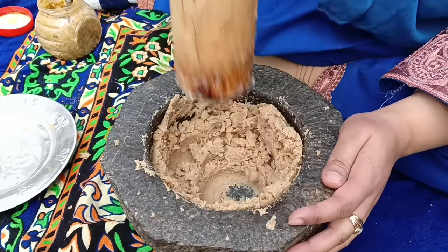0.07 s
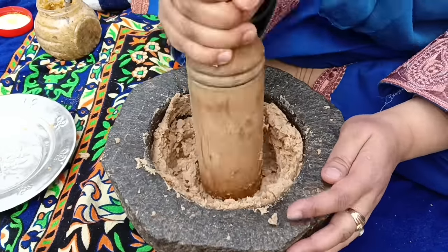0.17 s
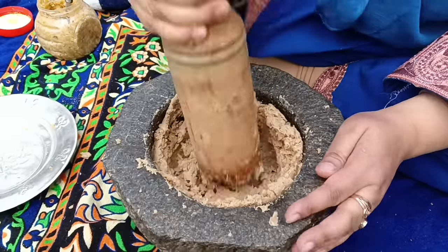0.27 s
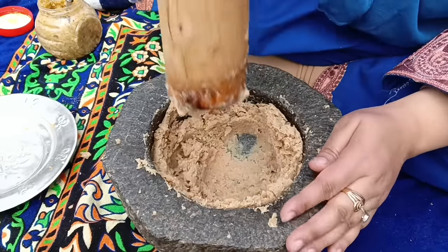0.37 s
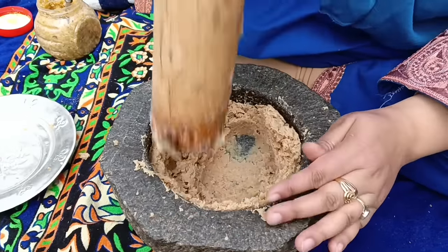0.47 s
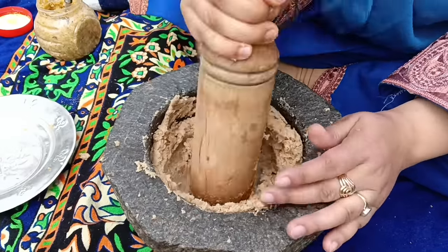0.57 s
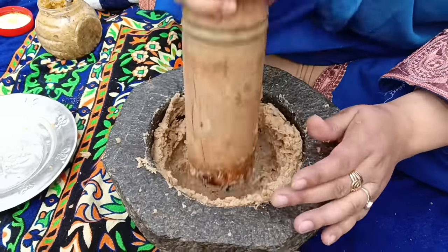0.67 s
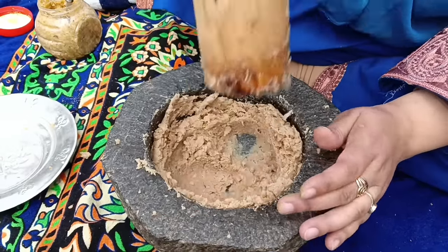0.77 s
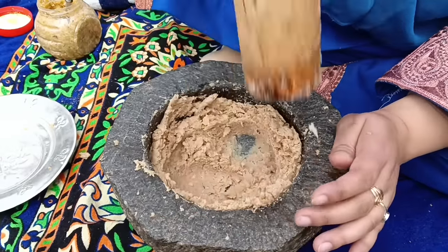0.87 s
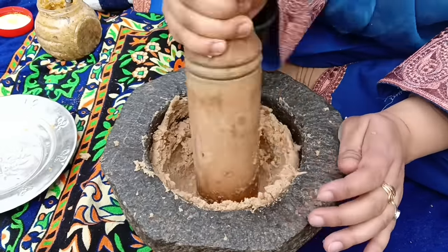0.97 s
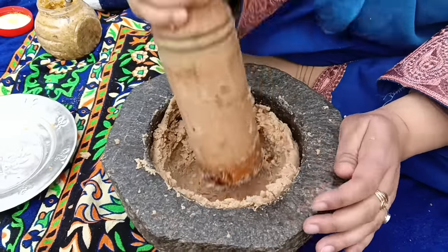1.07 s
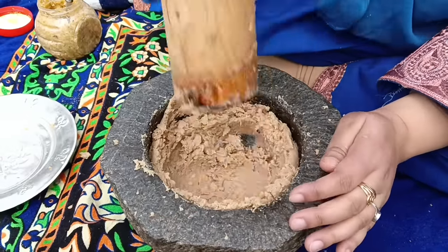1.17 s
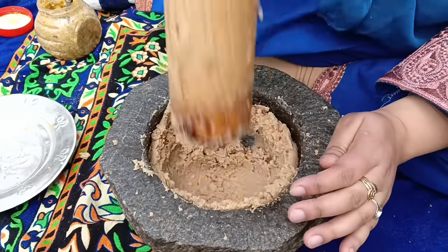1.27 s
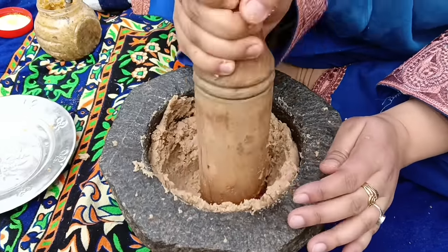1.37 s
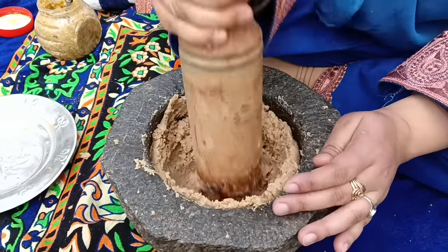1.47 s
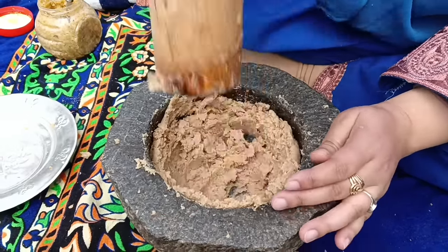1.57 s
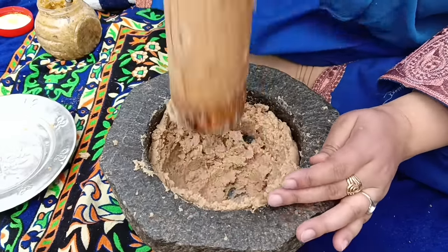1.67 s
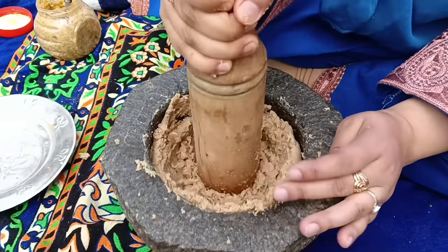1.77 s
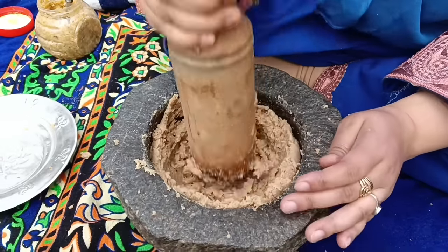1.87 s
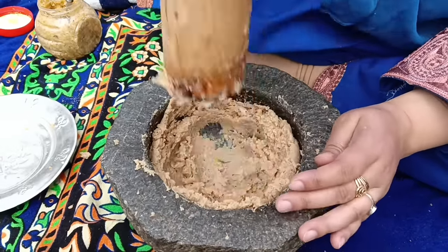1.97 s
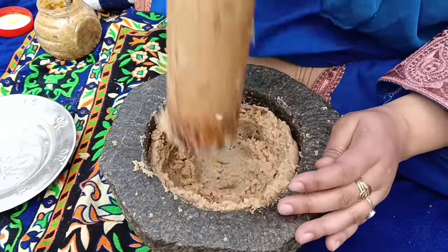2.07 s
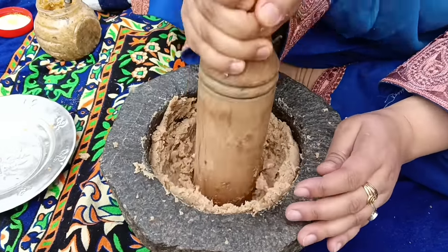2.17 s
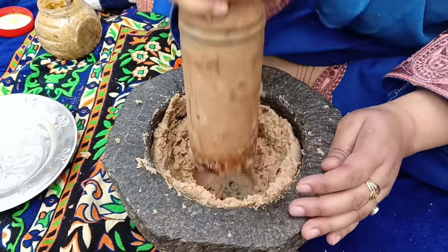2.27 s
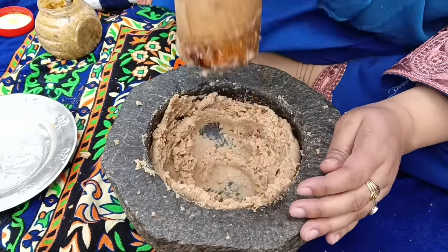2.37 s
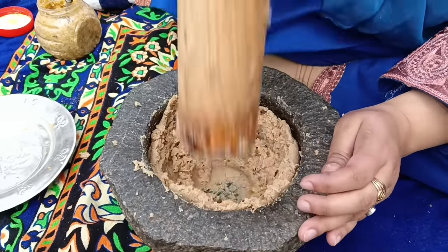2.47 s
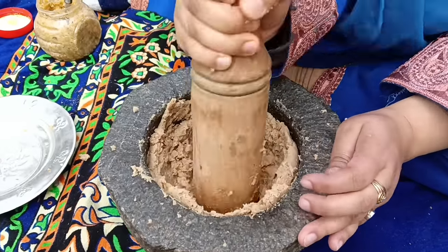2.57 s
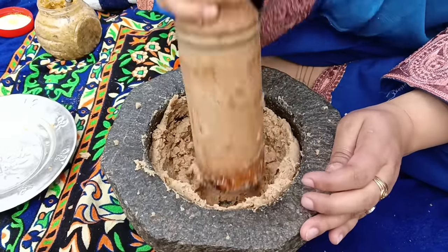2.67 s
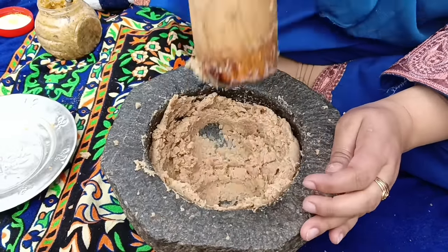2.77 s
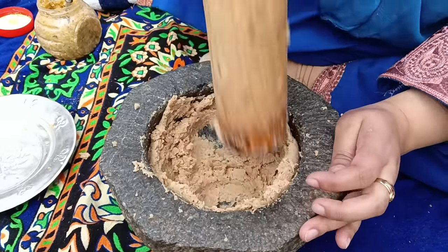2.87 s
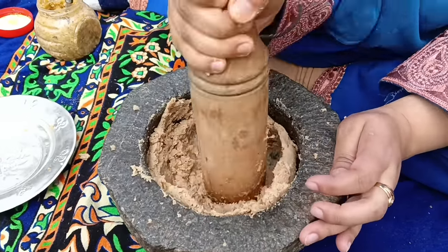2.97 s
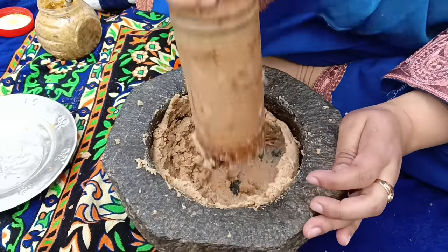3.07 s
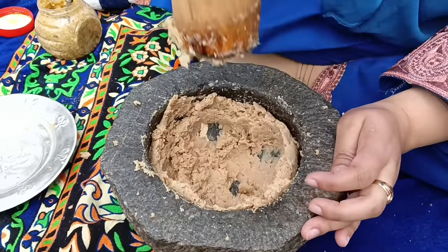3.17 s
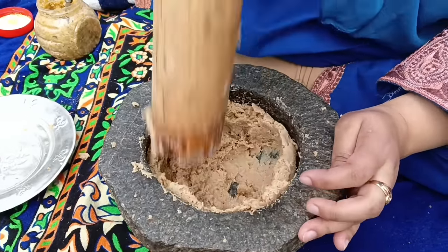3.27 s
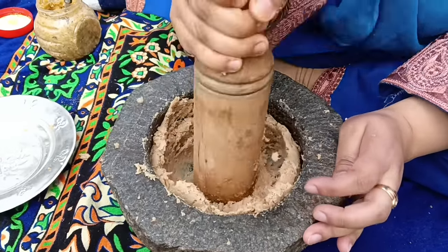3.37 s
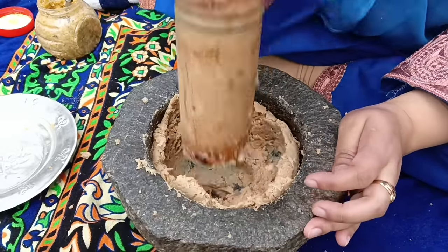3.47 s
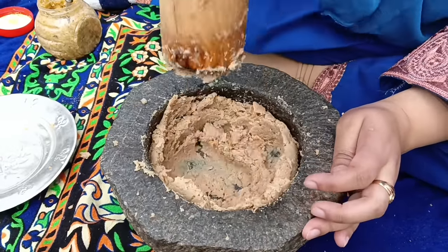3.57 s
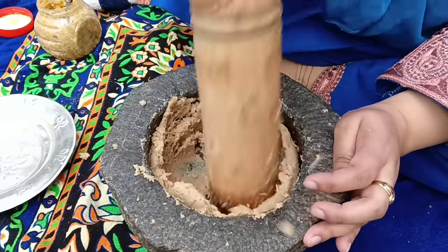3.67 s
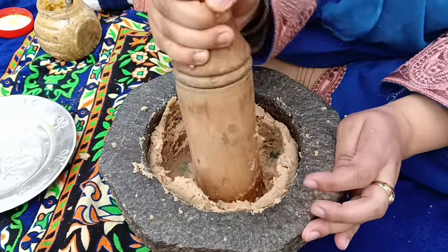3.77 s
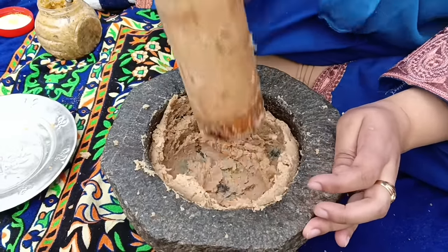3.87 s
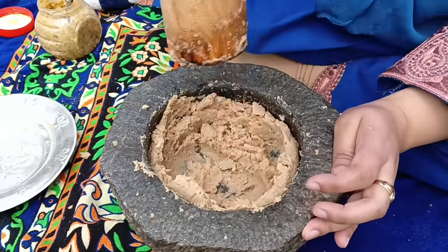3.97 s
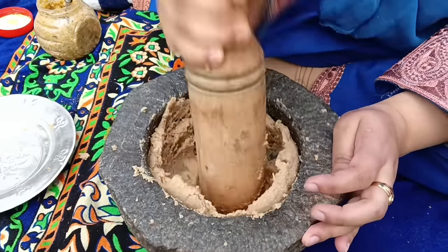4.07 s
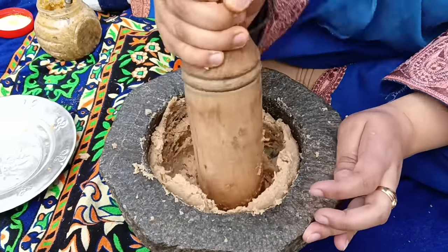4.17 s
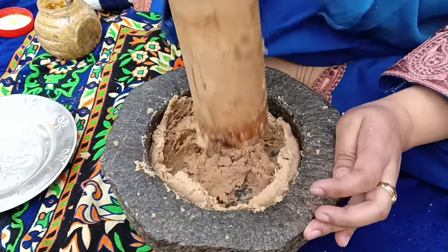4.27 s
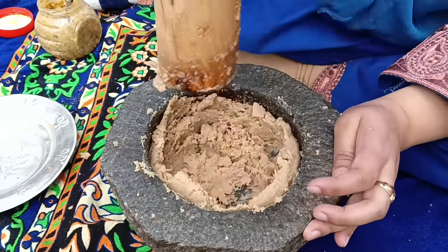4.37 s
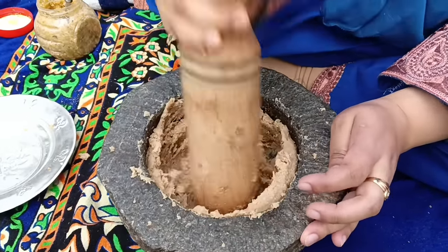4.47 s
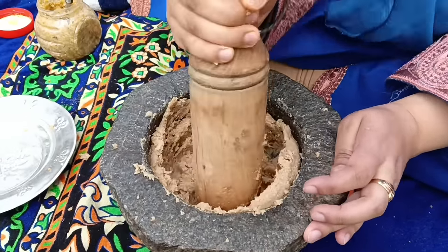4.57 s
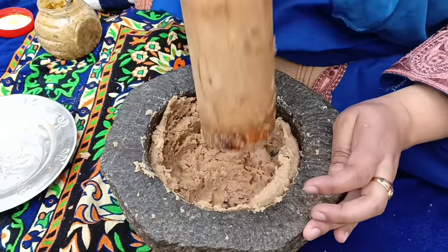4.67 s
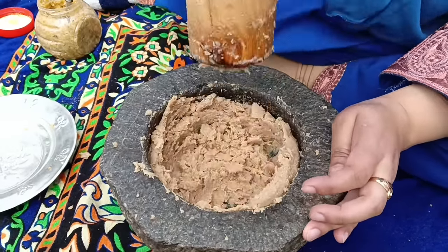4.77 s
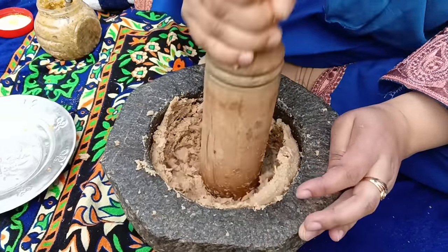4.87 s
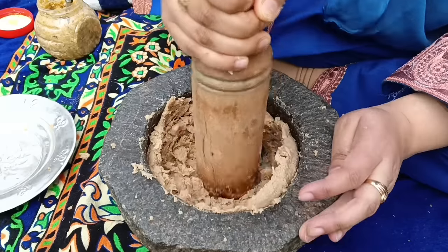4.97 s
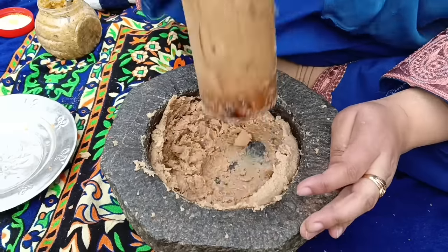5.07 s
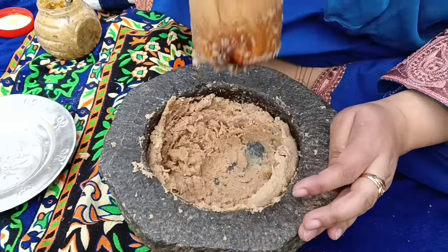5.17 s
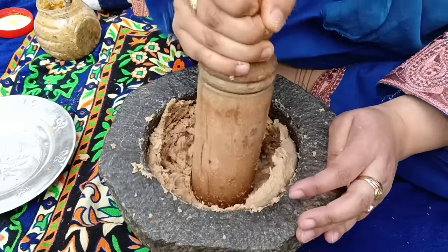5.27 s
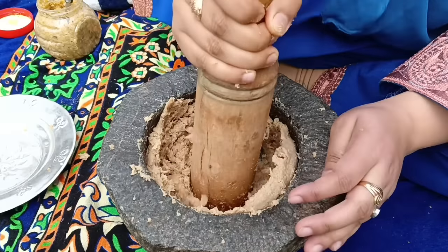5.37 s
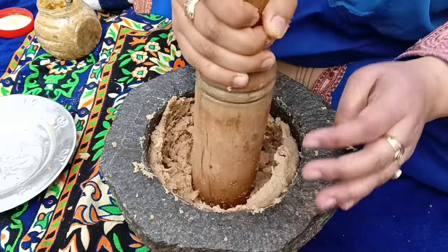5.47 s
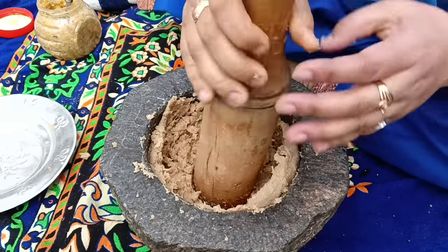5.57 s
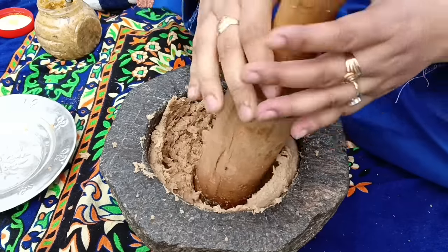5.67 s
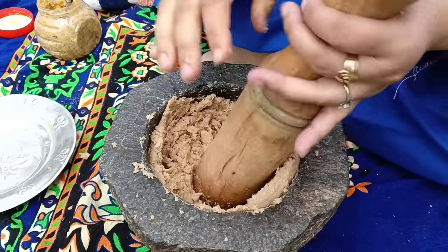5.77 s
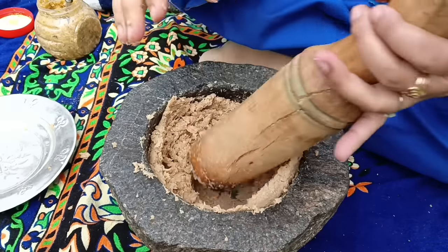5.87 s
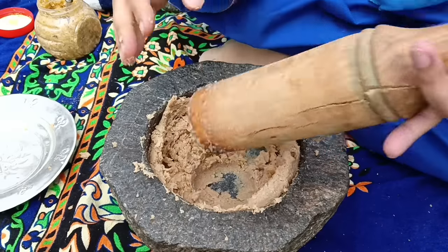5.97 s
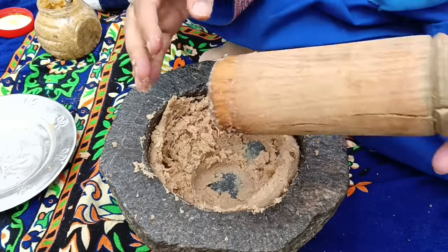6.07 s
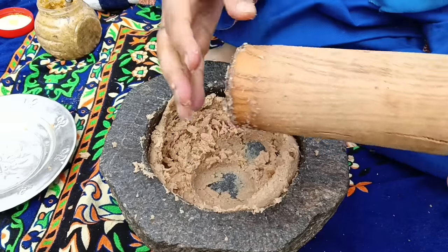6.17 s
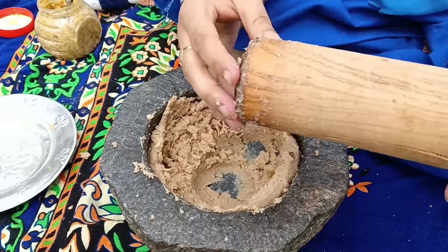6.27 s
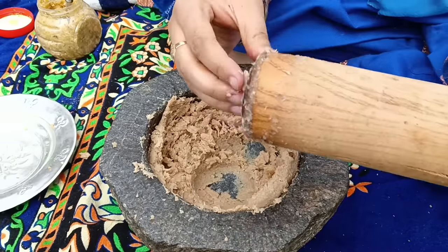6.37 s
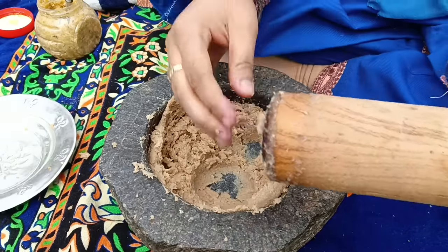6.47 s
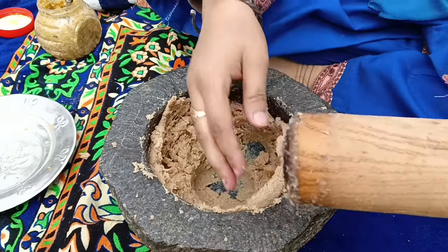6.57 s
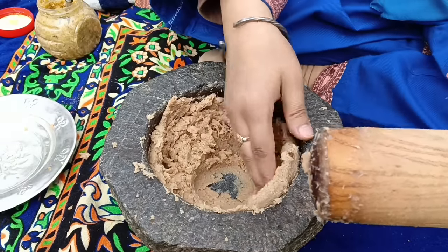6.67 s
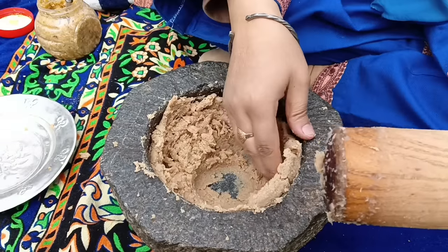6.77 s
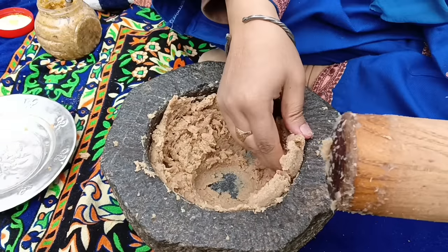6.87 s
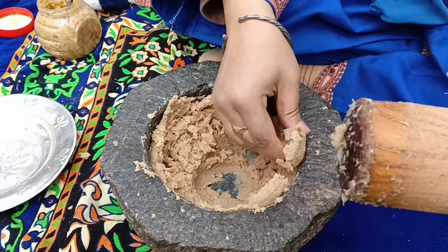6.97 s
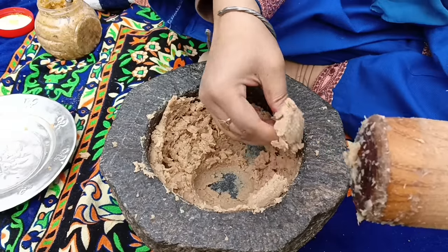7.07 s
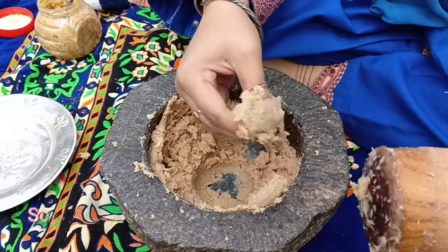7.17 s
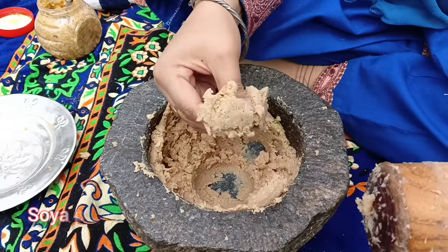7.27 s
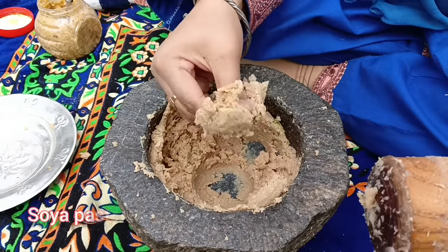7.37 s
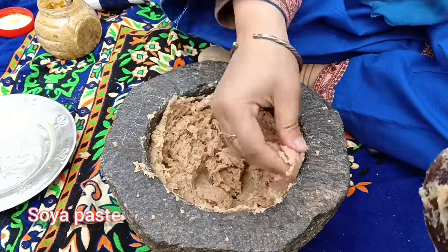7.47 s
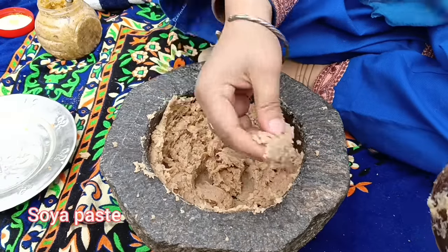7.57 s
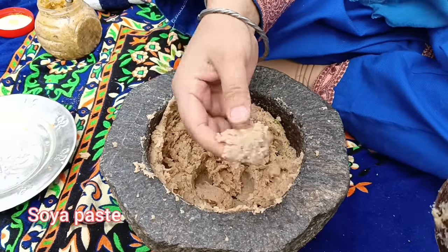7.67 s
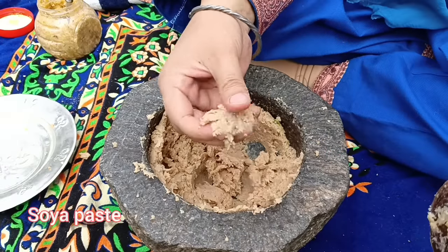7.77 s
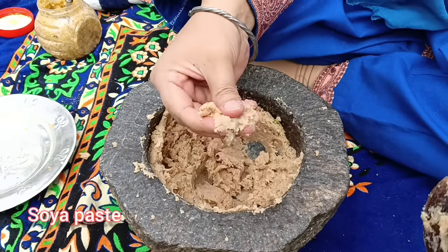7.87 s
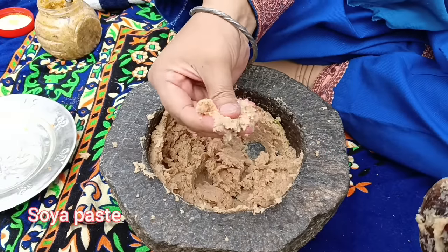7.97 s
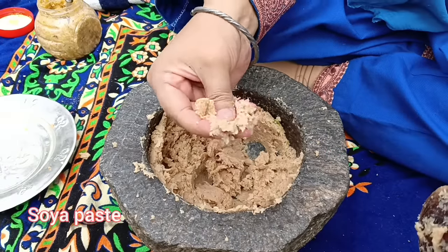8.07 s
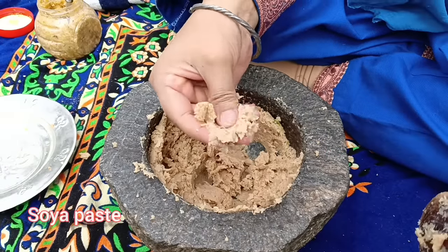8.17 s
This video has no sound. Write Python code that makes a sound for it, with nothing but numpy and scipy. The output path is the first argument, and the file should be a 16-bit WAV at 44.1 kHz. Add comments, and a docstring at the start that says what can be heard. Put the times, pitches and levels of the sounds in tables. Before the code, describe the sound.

Close, steady hollow knocks and wet squelches of pestle in stone mortar, soft bird whistles beyond, then quiet with rough squawks and fingers rustling.

```python
"""Fourteen evenly spaced blows, some hard and some soft, of a wooden pestle on moist paste in a stone mortar,
close to the microphone in a room.
Each blow squishes the paste with bursts of crackle and pops the air trapped in the hollow.
Bowl, mortar and pestle ring as short damped modes; noise makes the grinding on and the pull free.
Birds further off whistle in gliding sines and later squawk in rough pulses.
Late on, fingers gather the paste with a faint rustle of filtered noise."""
import sys
import numpy as np
from scipy import signal
from scipy.fft import rfft, irfft, next_fast_len
from scipy.io import wavfile
from scipy.ndimage import map_coordinates

SR = 44100
rng = np.random.default_rng(int(sys.argv[2]) if len(sys.argv) > 2 else 0)


def inscribe(sig):
    """Save sig as 16-bit PCM at rate SR to the path in sys.argv[1].

    A 1-D sig is mono; a 2-D sig holds one channel per row.
    Samples are clipped to [-1, 1] before scaling.
    """
    pcm = np.round(np.clip(np.atleast_2d(sig).T, -1, 1) * 32767)
    wavfile.write(sys.argv[1], SR, pcm.astype(np.int16))


N = 361619  # samples, 8.2 s


def amp(db):
    """Decibels to gain."""
    return 10 ** (np.asarray(db) / 20)


def unit(x):
    """Scale to rms 1."""
    return x / np.sqrt(np.mean(x ** 2) + 1e-20)


def along(points, hz):
    """Read (Hz, value) points on a log frequency axis."""
    point_hz, values = np.transpose(points)
    return np.interp(np.log(hz + 1), np.log(point_hz + 1), values)


def ramp(t, length):
    """A smooth rise from 0 at t = 0 to 1 at t = length."""
    return np.sin(np.pi / 2 * np.clip(t / length, 0, 1)) ** 2


def add(out, start_s, x):
    """Mix x into out from start_s."""
    i = max(round(start_s * SR), 0)
    out[i:i + len(x)] += x[:len(out) - i]


def colour(x, points):
    """Filter x through a spectrum curve and scale it to rms 1."""
    m = next_fast_len(len(x) + 2048)
    gain = amp(along(points, np.fft.rfftfreq(m, 1 / SR)))
    return unit(irfft(rfft(x, m) * gain, m)[:len(x)])


def noise(n, points):
    """Coloured noise of rms 1."""
    return colour(rng.standard_normal(n), points)


def crackle(n, points, density):
    """Tiny ruptures, density a second on average, over a soft hiss."""
    grains = rng.standard_normal(n) * (rng.random(n) < density / SR)
    return colour(unit(grains) + 0.18 * rng.standard_normal(n), points)


def wobble(n, rate):
    """A smooth random curve through rate knots a second."""
    knots = rng.standard_normal(int(n * rate / SR) + 4)
    return map_coordinates(knots, [np.arange(n) * rate / SR])


def ring(modes, t, scatter_db):
    """Damped modes with random phases, their strengths scattered anew at each strike."""
    total = 0
    for hz, db, t60 in modes:
        decay = amp(db + scatter_db * rng.normal() - 60 * t / t60)
        total = total + decay * np.sin(2 * np.pi * (hz * t + rng.random()))
    return total * (1 - np.exp(-t / 0.00025))  # softened onset


def pop(t, hz, rise, decay):
    """A heavily damped air pocket, peaking at t = 0; it moves no net air."""
    envelope = np.exp(-(np.minimum(t, 0) / rise) ** 2 - np.maximum(t, 0) / decay)
    motion = np.sin(2 * np.pi * hz * t) * envelope
    return np.gradient(motion) * SR / (2 * np.pi * hz)


# reverberation time of the room: pitch_hz, t60_s
ROOM_DECAY = [(100, 0.35), (500, 0.35), (2000, 0.37), (5000, 0.43), (12000, 0.22)]


def room(x, early_db, late_db):
    """Nearby surfaces answer from 3 ms on; the room dies away after them, each pitch at its own rate."""
    hz, t, z = signal.stft(rng.standard_normal(SR // 2), SR, nperseg=256)
    fade = amp(-60 * t / along(ROOM_DECAY, hz)[:, None])
    tail = signal.istft(z * fade, SR, nperseg=256)[1]
    t = np.arange(len(tail)) / SR
    # sparse early reflections, 60 dB down after 55 ms
    early = rng.standard_normal(len(t)) * (rng.random(len(t)) < .03) * amp(-60 * t / .055)
    answer = amp(early_db) * unit(early) + amp(late_db) * unit(tail)
    answer = answer / np.sqrt(len(t)) * (t > .003)
    answer[0] = 1  # the direct sound
    return signal.fftconvolve(x, answer)


# spectrum of the quiet air: pitch_hz, level_db per Hz
AIR_SPECTRUM = [(15, -39), (25, -17.5), (76, 0.5), (123, 1.5), (405, -5.5), (624, -5), (911, -10),
                (1100, -9.5), (2610, -13.5), (3520, -23.5), (4870, -30), (6740, -34), (9320, -21),
                (12200, -37), (16000, -32)]


def air():
    """The quiet air of the room: coloured noise with a slowly drifting level."""
    return amp(-69 + 0.72 * wobble(N, 9)) * noise(N, AIR_SPECTRUM)


# paste squeezed out: start_s (its peak), width_s, low_db (before a 3 dB cut), middle_db, fizz_db
SQUISHES = [ (.047, .0044, -27, -35.5, -43.5), (0.442, .0083, -36, -40, -46),
            (.873, 0.0087, -40.5, -47, -50), (0.89, .0035, -35, -47, -63), (1.25, .0024, -18.5, -18, -27),
            (1.636, 0.0032, -28, -33, -45), (2.04, .003, -26.5, -33, -40.5), (2.43, .002, -30, -36.5, -45),
            (2.444, 0.005, -22, -31.5, -41.5), (2.829, 0.0098, -39, -39, -45.5),
            (3.234, .008, -33.5, -31.5, -38.5), (3.617, .002, -36, -24, -40),
            (4.001, .0044, -33, -26, -41.5), (4.4, .012, -41, -41, -43.5), (4.468, .005, -36, -43.5, -62),
            (4.7921, .0015, -24.5, -25.5, -38), (5.1951, .0015, -14, -25, -34)]
# spectra of the paste's low squelch, its middle and its fizz: pitch_hz, level_db per Hz
SQUISH_LOW = [(150, -17.5), (600, -0.5), (900, 1.5), (1400, -2.5), (2200, -34)]
SQUISH_MIDDLE = [(900, -26.5), (1600, -0.5), (2400, 2), (4000, -12), (7000, -31)]
FIZZ = [(2000, -32.5), (4000, -7.5), (6500, -8), (8800, 3), (10500, -2), (13000, -10.5), (16000, -17)]


def squishes():
    """Air and moisture spurt from under the pestle in a dense crackle, coloured by the narrow gap."""
    out, n, lead = np.zeros(N), SR // 8, 1 / 25
    t = np.arange(n) / SR - lead
    for start_s, width, low_db, middle_db, fizz_db in SQUISHES:
        low = amp(low_db - 3) * noise(n, SQUISH_LOW)
        middle = amp(middle_db) * crackle(n, SQUISH_MIDDLE, density=5400)
        fizz = amp(fizz_db) * crackle(n, FIZZ, density=1800)
        spurt = low + middle + fizz
        # the wall of the bowl returns each spurt about a millisecond later
        spurt = spurt + 0.67 * np.roll(spurt, round(SR * rng.uniform(0.0007, .0018)))
        rise = np.exp(-abs(np.minimum(t, 0) / (1.1 * width)) ** 1.6)
        swell = rise / np.cosh(np.clip(t / width, 0, 50))
        add(out, start_s - lead, room(swell * spurt, early_db=-12, late_db=-22.0))
    return out


# pestle blows: start_s, knock_db, pitch_hz of the hollow (nominal), thud_db (relative),
# pestle_ring_db (relative), bowl_ring_db, rocking_db, grinding_db, grinding_length_s
BLOWS = [ (0.0508, -6, 682, -27, -60, -25, -38, -50, .23), (0.438, -24, 840, -51, -70, -47, -39, -51.5, .1),
         (0.8293, -1.5, 739, -28, -38, -23, -37.5, -45, .18),
         (1.25, -12.5, 847, -33, -49.5, -31.5, -27.5, -50.5, .11),
         (1.6389, -3, 737, -26.5, -55, -27.5, -37, -47.5, .11),
         (2.039, -16, 1120, -42.5, -58, -32.5, -37, -52, .12),
         (2.43, -2, 815, -33, -40.5, -10, -32.5, -49, 0.11),
         (2.832, -26, 770, -51, -65.5, -47, -38.5, -45, .16),
         (3.2294, -24, 1163, -39, -51.5, -38, -38.5, -43, .11),
         (3.5996, 1.5, 925, -37, -38.5, -10.5, -40.5, -47.5, .14),
         (3.9988, -15, 790, -41.5, -47, -26, -28, -48, .14),
         (4.41, -32, 715, -47.5, -53.5, -47.5, -41, -52.5, .13),
         (4.7967, -.5, 773.7, -28.5, -56, -15, -42, -48.5, .13),
         (5.1973, -4, 1042, -28, -55.5, -29, -41, -59.5, .116)]
# ringing modes of the stone mortar, the pestle and the bowl: pitch_hz, level_db (relative), t60_s
MORTAR_MODES = [(133.5, -6, .07), (180, 0.5, 0.073), (216.2, -5.5, 0.069), (329, 0, 0.042),
                (406.7, -2, 0.044), (778, 0.5, 0.034)]
PESTLE_MODES = [(1530, -3, 0.054), (2024, -1.5, 0.068), (3600, -15.5, .12)]
BOWL_MODES = [(565, 1.5, 0.022)]
# spectrum of the stone rocking: pitch_hz, level_db per Hz
ROCKING = [(30, -18.5), (80, 0.5), (180, 2), (400, -7), (700, -13), (1500, -37.5)]
ROCK_AFTER_S, ROCK_WIDTH_S = .022, 0.016  # the stone settles back after a blow


def blows():
    """The pestle shuts the hollow with a pop; bowl, mortar and pestle ring briefly."""
    out, t, lead = np.zeros(N), np.arange(SR // 4) / SR, 1 / 200
    # the ringing keeps little below 100 Hz
    thin = signal.butter(2, 100, "highpass", fs=SR, output="sos")
    rock_swell = np.exp(-((t - ROCK_AFTER_S) / ROCK_WIDTH_S) ** 2)
    for start_s, knock_db, hz, thud_db, ring_db, bowl_db, rock_db, _, _ in BLOWS:
        knock = pop(t - lead, 0.9344 * hz, rise=0.00089, decay=0.0011)
        knock += amp(-18.0) * pop(t - lead, 2.1 * hz, rise=0.00045, decay=0.00022)
        add(out, start_s - lead, room(amp(knock_db) * knock, early_db=-13.5, late_db=-26.0))
        body = amp(thud_db + 9.5) * ring(MORTAR_MODES, t, scatter_db=1.0)
        body += amp(ring_db + 12.0) * ring(PESTLE_MODES, t, scatter_db=0)
        body += amp(bowl_db) * ring(BOWL_MODES, t, scatter_db=5)
        add(out, start_s, room(signal.sosfilt(thin, body), early_db=-12.5, late_db=-16.5))
        # the heavy stone rocks back onto the mat just after the blow
        add(out, start_s, amp(rock_db) * noise(len(t), ROCKING) * rock_swell)
    return out


# spectrum of pestle rubbing on stone: pitch_hz, level_db per Hz
GRIND = [(40, -10), (100, 6), (250, 3), (500, -3.5), (1000, -1), (1700, -6), (2060, -2.5), (2400, -7.5),
         (3200, -12), (5000, -27.5), (9000, -37.5)]
PRESS_S, LIFT_DB_PER_S = 0.015, 299.5  # the pestle beds in; the grinding dies once it lifts
PULL_AFTER_S, PULL_WIDTH_S = .11, .022  # it pulls out of the sticky paste
RUB_EASE_S, RUB_PULL_DB = .22, -7  # the rubbing eases off and swells again on the pull
POCKETS_PER_S, POCKET_DB = 70, -11  # tiny air pockets burst under the rubbing
GRIT_DB, GRIT_EASE_S, GRIT_PULL_DB = -9, .07, -0.5  # grit against the rubbing; its own ease and pull


def grinding():
    """The pestle presses on through the paste, bursting tiny air pockets, eases off, then pulls free."""
    out, n = np.zeros(N), SR // 3
    t = np.arange(n) / SR
    pull = np.exp(-((t - PULL_AFTER_S) / PULL_WIDTH_S) ** 2)
    rubbing = np.exp(-t / RUB_EASE_S) + amp(RUB_PULL_DB) * pull
    gritting = amp(GRIT_DB) * (np.exp(-t / GRIT_EASE_S) + amp(GRIT_PULL_DB) * pull)
    for start_s, *_, db, length in BLOWS:
        contact = ramp(t, PRESS_S) * amp(db - LIFT_DB_PER_S * np.maximum(t - length, 0))
        rub = amp(1.8 * wobble(n, 90)) * crackle(n, GRIND, density=1800)
        pockets = amp(POCKET_DB) * crackle(n, SQUISH_LOW, density=POCKETS_PER_S)
        grit = gritting * amp(1.2 * wobble(n, 140)) * crackle(n, FIZZ, density=2200)
        scrape = contact * (rubbing * (rub + pockets) + grit)
        add(out, start_s, room(scrape, early_db=-8.0, late_db=-15.5))
    return out


# quick contacts of pestle, hand and crumbs: start_s (its peak), peak_db (before the room),
# pitch_hz, tick_db (against the pop)
TAPS = [ (.2515, -33.5, 1500, 7.5), (.889, -22, 1305, -22), (1.718, -32, 1202, -23),
        (2.532, -31.5, 1392, -13), (2.8554, -27.5, 950, -21.5), (3.2299, -17, 1396, -16),
        (3.6373, -18, 850, -17.5), (3.661, -22, 1080, -22.5), (3.703, -28, 990, -15),
        (3.86, -47, 1090, -17.5), (4.0223, -17.5, 650, -22.5), (4.4265, -28.5, 700, -21.5),
        (4.466, -27.5, 1400, -20), (4.951, -34.5, 1077, -21), (5.1952, -11, 1426, -16.5),
        (5.26, -32, 895, -14), (5.343, -38.5, 1103, -18), (5.498, -43.5, 1148, -22),
        (5.658, -45.5, 1398, -7), (5.699, -46.5, 850, -6.5)]


def taps():
    """Quick contacts: a small pop with a gritty tick."""
    out, n, lead = np.zeros(N), SR // 16, 1 / 500
    t = np.arange(n) / SR - lead
    for start_s, db, hz, tick_db in TAPS:
        tick = noise(n, FIZZ) * np.exp(-abs(t) / 0.00049)
        knock = pop(t, hz, rise=0.0008, decay=0.00033) + amp(tick_db) * tick / abs(tick).max()
        add(out, start_s - lead, room(amp(db) * knock / abs(knock).max(), early_db=-7.0, late_db=-18.5))
    return out


# arched whistles: top_s, top_hz, rise_width_s, fall_width_s, before_top_s, after_top_s, level_db (relative)
WHISTLES = [(1.173, 5350, .019, .034, 0.063, 0.078, -42.5), (2.247, 5400, 0.024, .04, 0.075, 0.077, -40),
            (2.662, 7450, .09, 0.053, 0.021, 0.05, -60)]
# far bird notes: start_s, length_s, start_hz, end_hz, level_db (before a 2.5 dB cut)
FAR_NOTES = [ (1.11, .14, 1670, 1660, -64), (1.38, 0.14, 2933, 2850, -69.5), (2.745, .07, 3400, 2800, -65),
             (2.92, .11, 2750, 2565, -56), (3.28, 0.075, 2750, 3500, -51), (3.82, 0.093, 2830, 2635, -69),
             (3.92, 0.11, 4570, 3700, -68), (4.07, 0.13, 2610, 2420, -57), (4.163, .22, 2510, 2557, -61.5),
             (7.47, 0.052, 2526, 2300, -71), (7.55, 0.074, 2497, 1750, -70.5), (7.75, 0.25, 553, 586, -66)]
OVERTONE_DB, HARSH_DB = -21, 17.5  # the octave above; its extra gain on the rise
WHISTLE_FOOT, WHISTLE_RELEASE_S = .45, .022  # foot of an arch over its top pitch; fade at the end
# on the rise: pitch ratio and strength of the other side of the syrinx
SECOND_VOICE, SECOND_SHARE = 1.3, .53


def whistle(top_hz, rise, fall, before, after):
    """An arched glide; on its rise the syrinx adds a second voice and a harsher octave."""
    t = np.arange(-before, after, 1 / SR)
    arch = 1 / (1 + abs(t / np.where(t < 0, rise, fall)) ** 1.5)
    hz = top_hz * (WHISTLE_FOOT + (1 - WHISTLE_FOOT) * arch)
    phase = 2 * np.pi * np.cumsum(hz * (1 + .014 * wobble(len(t), 600))) / SR
    rising = ramp(-t - .01, 0.042)  # falls to 0 just before the top
    second = SECOND_SHARE * rising * np.sin(SECOND_VOICE * phase)
    octave = np.sin(2 * phase + 1.2 * wobble(len(t), 1500))
    overtone = amp(OVERTONE_DB + HARSH_DB * rising) * octave
    swell = np.sqrt(ramp(t + before, before)) * amp(-6 * rising) * ramp(after - t, WHISTLE_RELEASE_S)
    return swell * (np.sin(phase) + second + overtone)


def song():
    """Whistles swell up to the top of an arch; plain, unsteady notes glide further off."""
    near, far = np.zeros(N), np.zeros(N)
    for top_s, top_hz, rise, fall, before, after, db in WHISTLES:
        add(near, top_s - before, amp(db) * whistle(top_hz, rise, fall, before, after))
    for start_s, length, start_hz, end_hz, db in FAR_NOTES:
        n = round(length * SR)
        hz = np.linspace(start_hz, end_hz, n) * (1 + 0.021 * wobble(n, 120))
        level = amp(db - 2.5 + 3 * wobble(n, 60)) * np.sqrt(np.hanning(n))
        add(far, start_s, level * np.sin(2 * np.pi * np.cumsum(hz) / SR))
    # the room is strong against the direct sound, more so for the far notes
    return room(near, early_db=-7, late_db=-7.5)[:N] + room(far, early_db=-4.5, late_db=-3.5)[:N]


# scuffs of the pestle between the blows and after the last one: start_s, length_s, level_db (of the rubbing)
SCUFFS = [(3.05, 0.076, -58), (4.14, .045, -61.5), (4.24, 0.0484, -62), (4.96, .04, -61.5),
          (5.455, .031, -66), (5.625, 0.049, -64.5), (5.795, 0.0298, -66)]


def scuffs():
    """Short gritty rubs as the pestle shifts or lifts."""
    out = np.zeros(N)
    for start_s, length, db in SCUFFS:
        n = round(length * SR)
        rub = crackle(n, GRIND, density=830)
        grit = amp(-10) * crackle(n, FIZZ, density=810)
        swell = amp(db) * np.sqrt(np.hanning(n))
        add(out, start_s, room(swell * (rub + grit), early_db=-7, late_db=-12.0))
    return out


# strokes of the fingers through the paste: start_s, length_s, crackle_db, rubbing_db
STROKES = [(5.44, .41, -80, -74.5), (6.12, .21, -75, -59), (6.41, .38, -70, -65.5),
           (6.778, 0.25, -72, -76.5), (7.018, .39, -73.5, -78), (7.43, 0.1635, -80.5, -84.5),
           (7.659, .49, -78, -71)]
# spectra of the crackling paste and the brushing sleeve: pitch_hz, level_db per Hz
CRUMBS = [(2000, -22), (4000, -10.5), (6500, -6.5), (9200, 6), (10800, -5.5), (12200, -4), (13500, -10),
          (16000, -13)]
SLEEVE = [(60, -4), (150, 2.5), (600, 2.5), (1300, -2), (3500, -22.5)]
STROKE_ATTACK_S, STROKE_RELEASE_S = 0.035, 0.045


def rustle():
    """With each stroke of the fingers the paste crackles and the sleeve brushes along."""
    out = np.zeros(N)
    for start_s, length, crackle_db, rub_db in STROKES:
        n = round(length * SR)
        t = np.arange(n) / SR
        crumb_level = amp(crackle_db + 1.8 * wobble(n, 50) + 1.7 * wobble(n, 12.2))
        crumbs = crumb_level * crackle(n, CRUMBS, density=1400)
        sleeve = amp(rub_db) * noise(n, SLEEVE)
        touch = ramp(t, STROKE_ATTACK_S) * ramp(length - t, STROKE_RELEASE_S)
        add(out, start_s, touch * (crumbs + sleeve))
    return out


# squawks: start_s, start_hz, sag_hz_per_s, attack_s, hold_s, throat_size (relative), level_db
SQUAWKS = [(6.1, 475.5, 1007, .065, 0.028, 0.95, -38.5), (6.399, 407.3, 348.5, 0.024, 0.049, 1.05, -34.5),
           (7.03, 471.5, 995, 0.038, 0, 0.96, -55.5), (8.0, 436.8, 794, 0.035, 0, 0.99, -65)]
# spectrum of the bird's throat at size 1: pitch_hz, level_db per Hz
THROAT = [(120, -18), (250, -18), (370, -10.5), (600, -17.5), (850, -8), (1080, -8.5), (1500, -1),
          (1950, 5.5), (2300, -1), (2700, -7.5), (3700, -33), (4900, -28), (5600, -30), (6200, -23),
          (7200, -41.5), (9300, -27.5), (14000, -54)]
SQUAWK_S, SQUAWK_FADE_DB_PER_S = 0.282, 126.5  # length of a call; fade after the hold
ROUGH_START, ROUGH_PER_S = 0.21, 4.26  # share of noise: a call breaks up as it goes
ODD_DB = -4.5  # odd harmonics against even ones


def squawks():
    """Harsh calls: the pitch sags and the pulses break up into noise as each one fades."""
    out, t = np.zeros(N), np.arange(0, SQUAWK_S, 1 / SR)
    rough = np.clip(ROUGH_START + ROUGH_PER_S * t, 0, .95)
    for start_s, hz, sag, attack, hold, throat_size, db in SQUAWKS:
        # a larger throat resonates lower
        throat = [(f / throat_size, level) for f, level in THROAT]
        cycles = np.cumsum((hz - sag * t) * (1 + .044 * rough * wobble(len(t), 400))) / SR
        harmonics = sum(amp(ODD_DB * (k % 2)) * np.cos(2 * np.pi * k * cycles) for k in range(1, 25))
        pulses = colour(harmonics, throat)
        # noise that swells once per cycle
        rasp = colour(rng.standard_normal(len(t)) * (1 + np.cos(2 * np.pi * cycles)), throat)
        fade = amp(db - SQUAWK_FADE_DB_PER_S * np.maximum(t - attack - hold, 0))
        effort = np.minimum(t / attack, 1) * fade * ramp(SQUAWK_S - t, 0.058)
        add(out, start_s, effort * (np.sqrt(1 - rough) * pulses + np.sqrt(rough) * rasp))
    return room(out, early_db=-3, late_db=-4.5)[:N]


def scene():
    """All sources over the quiet air of the room, on one channel."""
    pounding = squishes() + blows() + grinding() + taps() + scuffs()
    return (air() + pounding + song() + rustle() + squawks())[None]


def record(dry):
    """The microphone sheds rumble; the recorder clips at full scale and keeps nothing above its band limit."""
    dry = signal.sosfilt(signal.butter(2, 42, "highpass", fs=SR, output="sos"), dry)
    m = next_fast_len(N + SR // 2)
    band = ramp(16150 - np.fft.rfftfreq(m, 1 / SR), 400)  # fades out from 15750 to 16150 Hz
    return irfft(rfft(np.clip(dry, -1, 1), m) * band, m)[:, :N]


dry = scene()
out = record(dry)
inscribe(out)
```